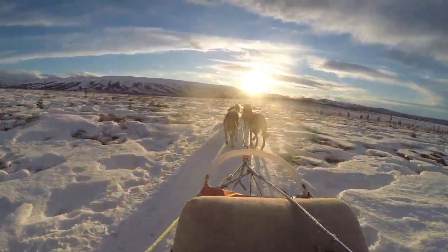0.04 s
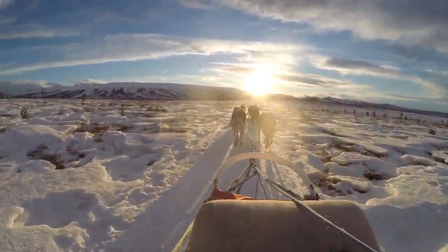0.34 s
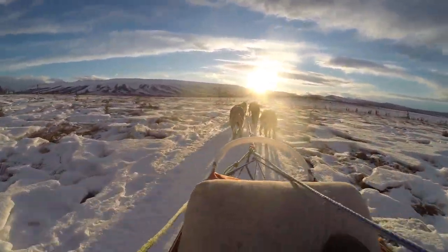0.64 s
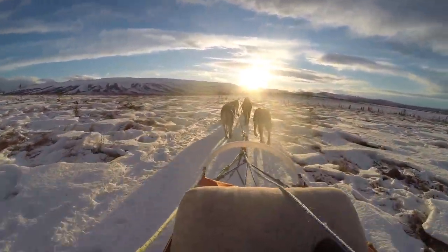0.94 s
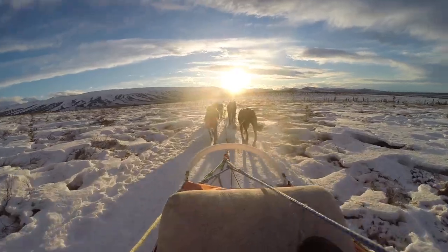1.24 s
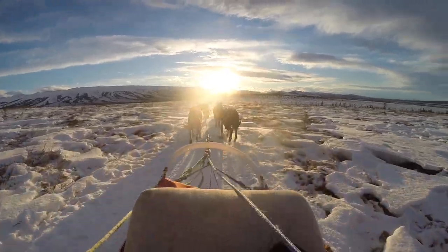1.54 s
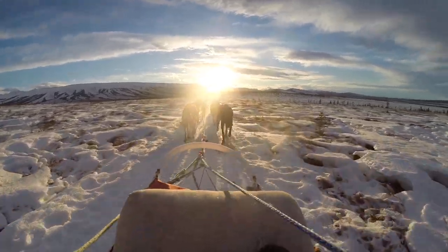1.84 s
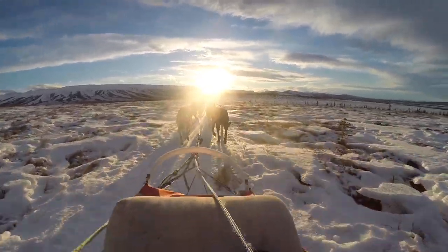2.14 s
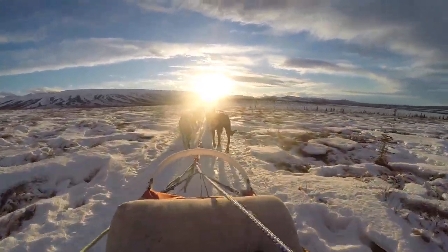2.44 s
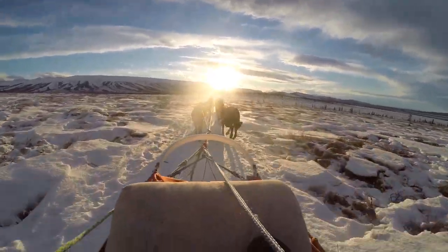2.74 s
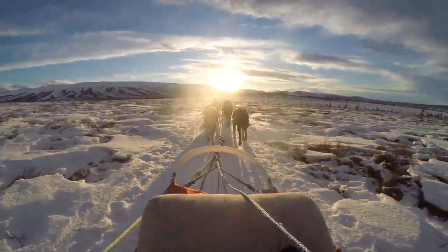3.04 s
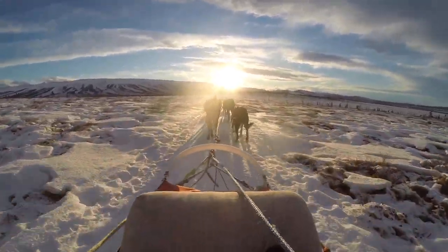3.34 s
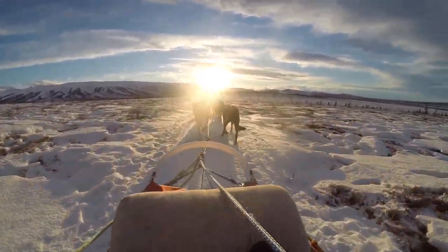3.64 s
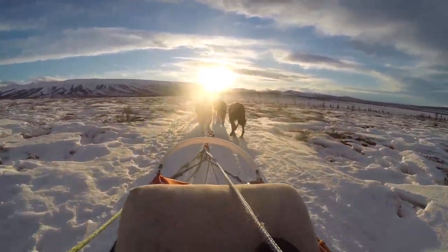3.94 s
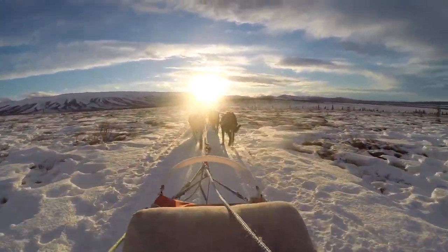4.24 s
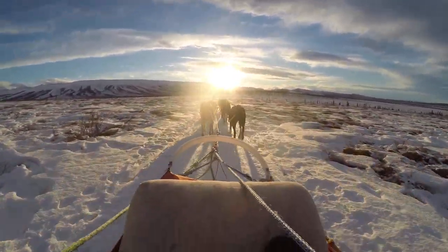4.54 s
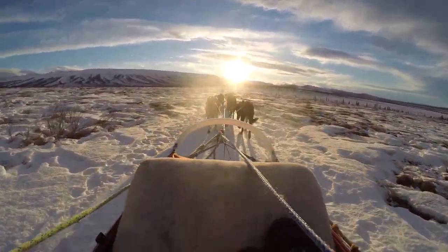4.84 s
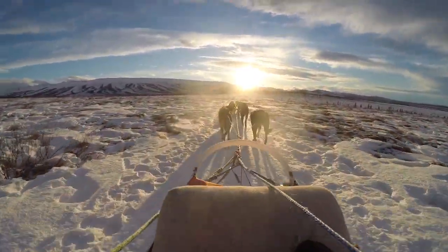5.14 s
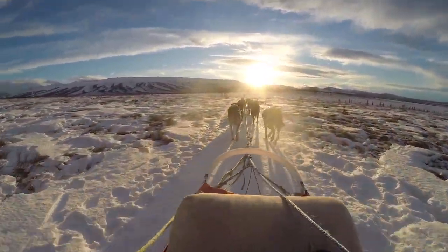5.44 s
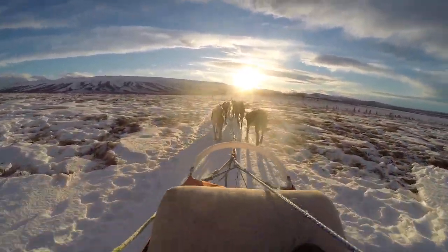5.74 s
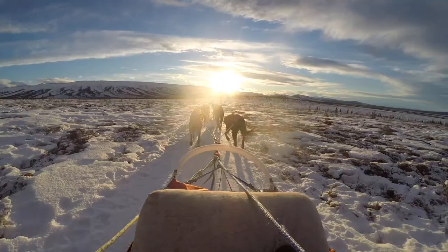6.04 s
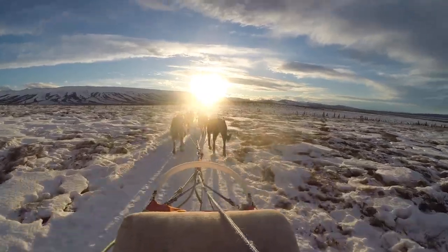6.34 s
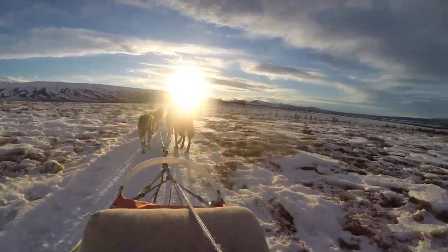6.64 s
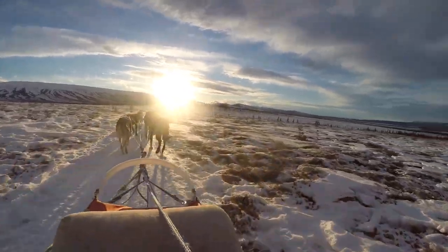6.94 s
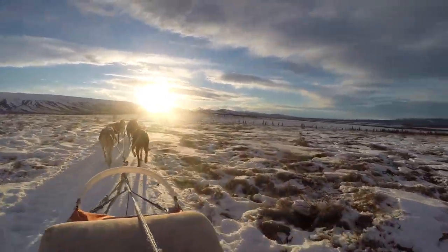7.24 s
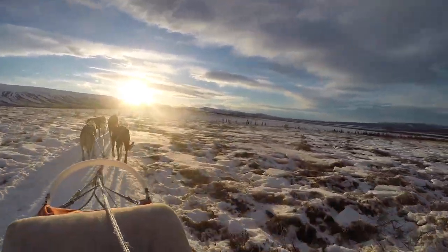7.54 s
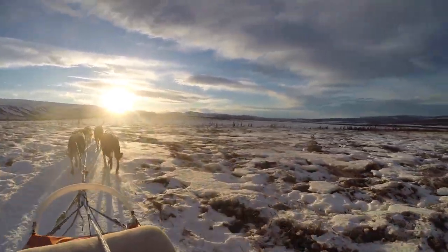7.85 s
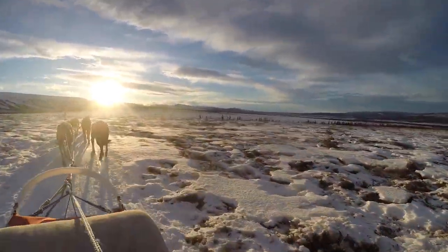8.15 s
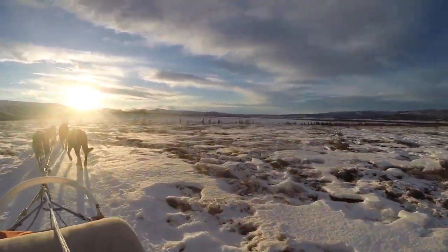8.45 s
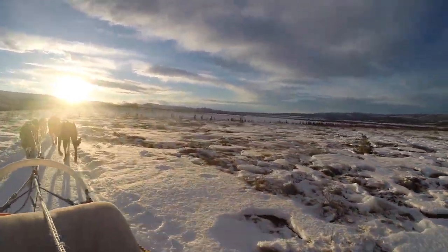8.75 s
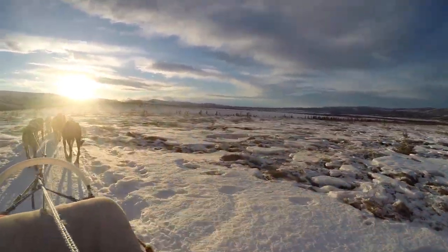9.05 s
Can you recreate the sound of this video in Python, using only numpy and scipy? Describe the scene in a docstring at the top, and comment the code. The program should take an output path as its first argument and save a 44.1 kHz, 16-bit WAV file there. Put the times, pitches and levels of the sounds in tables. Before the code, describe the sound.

A dog sled glides over crusty snow, its runners making a close, grainy rush that swells and eases. Wind buffets the microphone on the sled, and the frame shudders with low, soft jolts. About halfway through, a few ice crumbs tick sharply against the microphone. Near the end the open trail turns rough, and a quick run of hollow knocks and clacks shakes the sled.

```python
"""Riding a dog sled over snow

One microphone, in a camera on the sled, close to the runners: snow grains break under them in a rush
and hiss, and fine powder sizzles. Wind buffets the microphone; ruts and drifts shake the frame.
Bumps knock it, most of all on the rough ground at the end, and ice crumbs tick on the housing."""
import sys
import numpy as np
from scipy import signal
from scipy.fft import rfft, irfft, next_fast_len
from scipy.io import wavfile
from scipy.ndimage import uniform_filter1d

SR = 44100
rng = np.random.default_rng(int(sys.argv[2]) if len(sys.argv) > 2 else 0)


def generate_wav(sig):
    """Save sig (samples, or channels by samples) to the path in sys.argv[1] as 16-bit PCM at SR."""
    pcm = np.round(np.clip(np.atleast_2d(sig).T, -1, 1) * 32767).astype(np.int16)
    wavfile.write(sys.argv[1], SR, pcm)


N = 400869
T = np.arange(N) / SR

# friction of the runners on the snow (time [s], level [dB])
FRICTION = [(0.0, -54), (0.29, -44.5), (0.76, -50), (0.83, -46), (2.24, -46), (2.35, -55), (2.74, -53),
            (3.28, -41.5), (3.94, -47.5), (4.13, -40.5), (4.59, -47.5), (4.92, -40), (5.28, -41),
            (5.42, -47.5), (5.57, -39), (6.26, -47.5), (6.36, -41.5), (6.78, -47), (7.38, -46.5),
            (7.44, -41), (8.29, -51), (8.71, -53.5), (9.09, -45.5)]
# crisp patches where the runners dig in (time [s], length [s], rise in friction [dB])
CRISP_PATCHES = [(0.024, 0.26, 13.5), (1.065, .07, 4.5), (1.487, 0.088, 1.5), (1.936, 0.078, 4),
                 (2.03, 0.091, 4), (2.192, 0.092, 4), (2.49, 0.17, 7.5), (2.995, 0.11, 4),
                 (3.296, 0.09, 1.5), (4.212, .11, 3), (4.523, 0.094, 5.5), (5.887, 0.1, 4),
                 (7.58, 0.074, 2.5), (7.747, .08, 2), (8.128, 0.13, 5.5), (8.78, 0.1, 9.5)]
# crests where the sled goes light (time [s], length [s], change in friction [dB])
CRESTS = [(0.581, .07, -7), (1.395, 0.18, -3.5), (1.643, 0.051, -9.5), (1.828, 0.23, -6.5),
          (2.097, 0.066, -2), (2.27, 0.067, 1), (2.753, 0.075, -11), (4.585, 0.031, -5), (4.797, 0.042, -4),
          (5.007, 0.069, -5.2), (7.31, 0.059, -9), (7.819, 0.069, -4), (8.01, 0.14, -7)]
# lumps of crust that break (time [s], rise in friction [dB])
CRUST_LUMPS = [(1.785, 6.5), (2.156, 6.5), (4.808, 9.5), (4.866, 1), (5.868, 3)]
# broad spectrum of the runners (frequency [Hz], relative level [dB])
SNOW_SPECTRUM = [(100, -4.5), (250, 6), (450, -3), (800, -2), (1100, -1.5), (1600, 0), (2000, -2.5),
                 (2700, -3.5), (3200, -11.5), (5150, -16.5), (5700, -22), (8400, -28), (9600, -37),
                 (15000, -47.5)]
# air resonances of the housing around the microphone (frequency [Hz], width [Hz], gain [dB])
HOUSING_RESONANCES = [(634, 80, 5), (1314, 248, 9.5), (2387, 250, 5), (3815, 580, 6.5), (4840, 880, 8.5),
                      (6880, 350, 6), (6970, 260, -2), (11450, 1000, 3), (12200, 500, 3.5)]
# sizzle of powder thrown up by the runners (time [s], level [dB])
POWDER_SPRAY = [(0.0, -75), (2.88, -74.5), (3.29, -74), (3.8, -75), (4.1, -72), (4.73, -78), (4.96, -76),
                (5.39, -74), (5.74, -74), (6.0, -72), (7.34, -74), (7.57, -66.5), (8.43, -74),
                (9.09, -69.5)]
# roughness of the ride (time [s], wind level [dB], shudder level [dB])
RIDE_LEVELS = [(0.0, -35.5, -40), (0.3, -33, -49), (0.88, -38, -43), (2.33, -33, -47), (2.66, -39, -50),
               (3.39, -34, -45), (3.87, -39.5, -47), (4.2, -30, -41.5), (4.73, -38.5, -45),
               (5.06, -29.5, -43), (5.95, -33.5, -41.5), (6.61, -35, -41.5), (8.18, -29.5, -42),
               (9.09, -29.5, -47)]
# wind on the microphone (frequency [Hz], relative level [dB])
WIND_SPECTRUM = [(8, -16), (20, 0.5), (35, -1), (55, -2), (78, -1.5), (105, -7.5), (130, -14), (200, -26),
                 (400, -52), (4000, -130)]
# shudder of the frame (frequency [Hz], relative level [dB])
SHUDDER_SPECTRUM = [(60, -9.5), (120, 5), (170, 0.5), (240, -6.5), (310, -10.5), (420, -16.5), (640, -18),
                    (900, -30), (6000, -110)]
# bumps on the frame (time [s], weight [dB], sharpness of contact [dB], rebound gap [s])
BUMPS = [(0.013, -26.5, -43.5, 0.0024), (0.643, -26.5, -33, 0.0025), (0.701, -31, -48, 0.018),
         (1.359, -28, -55, 0.0012), (6.851, -26.5, -32.5, 0.0028), (7.494, -25, -35, 0.0011),
         (7.572, -24, -33, 0.021), (7.7562, -26, -28.5, 0.00053), (7.8355, -25.5, -32.5, 0.00071),
         (8.125, -26, -49, 0.004), (8.1609, -22.5, -30, .0215), (8.236, -26, -31.5, 0.0015),
         (8.27, -28, -53, 0.0049), (8.341, -23.5, -28, 0.019), (8.413, -27.5, -34, 0.00024),
         (8.4968, -23.5, -26, 0.00085), (8.547, -28, -33, 0), (8.638, -27, -32, 0.026), (8.81, -30, -27, 0),
         (8.8586, -23.5, -27.5, 0.00064), (8.879, -30, -40, 0.0038), (8.904, -25.5, -34.5, 0),
         (8.9335, -21, -27.5, 0)]
# frame modes rung by the weight of a blow (frequency [Hz], level [dB], t60 [s])
THUD_MODES = [(73.5, 12, 0.1), (189.6, 7, 0.038), (241, -1, 0.042), (288, -5, 0.055), (646, -16.5, 0.063),
              (686, -10.5, 0.045)]
# frame modes rung by the hard contact (frequency [Hz], level [dB], t60 [s])
CLACK_MODES = [(996, -5, 0.017), (1260, -1.3, 0.016), (1486, 5, 0.013), (2097, -5, 0.02),
               (2414, -5.5, 0.016), (4160, -8, 0.002), (4600, -11, 0.0048)]
# soft heaves over drifts (time [s], level [dB])
DRIFTS = [(2.318, -24), (2.498, -13.5), (3.482, -21), (4.536, -18), (5.168, -22), (5.884, -16),
          (6.863, -25), (7.231, -18.5), (8.661, -17.5)]
# ice crumbs striking the housing (time [s], level [dB], fragment level [dB])
ICE_CRUMBS = [(1.0038, -43, -67), (1.6624, -36, -55), (2.196, -39, -60), (2.4246, -40, -58),
              (2.4768, -43, -63), (2.773, -41, -60), (2.793, -36.5, -52), (2.83, -37, -59),
              (2.845, -40, -60), (4.7559, -28.5, -48), (4.767, -35, -42), (4.981, -18.5, -52),
              (5.0157, -31.5, -46), (5.885, -29.5, -42), (8.6774, -44, -64)]
# modes of the housing's shell (frequency [Hz], level [dB], t60 [s])
SHELL_MODES = [(4600, -12, 0.0042), (4940, 3, 0.006), (6960, -5.5, 0.005), (7950, -1.5, 0.0026),
               (11120, -8, 0.0041), (12500, -15, 0.0037), (14100, -15, .002)]

# a blow runs along the frame and back: the time it takes and the share that returns
RETURN_S, RETURN_SHARE = 0.00312, 0.54


def runners(rush_db=0.58, hiss_db=-13.0, grains_per_s=2500, shatter_db=-46.5, skim_db=-53.5):
    """Countless snow grains break under the runners, close by; hard pressure brightens the hiss."""
    friction_db = curves(FRICTION)[0] + terrain() + 0.48 * wander(7)
    bite_db = 0.67 * np.maximum(friction_db - shatter_db, 0)  # shattering crust: extra hiss
    bite_db += 0.3 * np.maximum(skim_db - friction_db, 0)  # skimming: the hiss outlasts the rush
    sizes = amp(3 * np.minimum(rng.exponential(1, N), 4)) * rng.choice([-1, 1], N)
    grains = unit(sizes * (rng.random(N) < grains_per_s / SR))
    snow = colour(rng.standard_normal(N) + 0.47 * grains, snow_colour)
    lows = colour(snow, lambda hz: rolloff_db(hz / 3000))
    hiss = (snow - lows) / band_rms(snow, 3300, 5500)
    rush = lows / band_rms(snow, 1000, 3000)
    load = amp(friction_db + crust() + wander(25))  # the runners catch and slip on uneven crust
    return load * (rush * amp(rush_db) + hiss * amp(hiss_db + bite_db + 1.5 * wander(38)))


def terrain():
    """Change of friction in dB: it swells smoothly on crisp patches and eases over crests."""
    change_db = np.zeros(N)
    for s, length, db in CRISP_PATCHES + CRESTS:
        near = abs(T - s) < length / 2
        change_db[near] += db * np.cos(np.pi * (T[near] - s) / length) ** 2
    return change_db


def crust(fade_s=0.02):
    """Extra friction in dB: it leaps as a lump breaks and quickly dies away."""
    rise_db = np.zeros(N)
    for s, db in CRUST_LUMPS:
        add(rise_db, s, db * np.exp(-T[:SR // 5] / fade_s))
    return uniform_filter1d(rise_db, size=60)


def snow_colour(hz):
    """The spectrum of the snow in dB, as it reaches the microphone through the housing."""
    resonances = sum(db / (1 + (2 * (hz - f) / width) ** 2) for f, width, db in HOUSING_RESONANCES)
    return spectrum_db(SNOW_SPECTRUM, hz) + resonances


def rumble(wind_db=3.0, shudder_db=-1.0, gust_db=2.03, jolt_db=3.5):
    """Wind buffets the microphone; the frame shudders over ruts, more where the runners dig in."""
    buffet_db, shake_db = curves(RIDE_LEVELS)
    wind = unit(colour(rng.standard_normal(N), lambda hz: spectrum_db(WIND_SPECTRUM, hz)))
    frame = unit(colour(rng.standard_normal(N), lambda hz: spectrum_db(SHUDDER_SPECTRUM, hz)))
    wind *= amp(wind_db + buffet_db + gust_db * wander(8))
    frame *= amp(shudder_db + shake_db + 0.43 * terrain() + jolt_db * wander(11.7))
    return wind + frame


def ruts(gain_db=8, per_s=18, rock_hz=92, t60=0.07):
    """Small ruts come at random, and each gives the loaded sled a soft, low jolt."""
    t = T[:SR // 5]
    sizes = amp(2 * np.minimum(rng.exponential(1, N), 2)) * (rng.random(N) < per_s / SR)
    jolt = amp(-60 * t / t60) * np.sin(2 * np.pi * rock_hz * t) * (1 - np.exp(-t * rock_hz))
    jolts = signal.oaconvolve(sizes, jolt / abs(jolt).max())[:N]
    return amp(gain_db + curves(RIDE_LEVELS)[1]) * jolts


def bumps(lag_s=0.0011):
    """A hard bump clacks, then its weight rocks the frame; the returning wave makes the thud hollow."""
    clacks, thuds = np.zeros(N), np.zeros(N)
    for s, weight_db, sharp_db in landings():
        add(clacks, s, amp(sharp_db) * ring(CLACK_MODES, spread=0.05, rise_s=0.0003))
        thud = amp(weight_db) * ring(THUD_MODES, spread=0.025, rise_s=0.002)
        add(thuds, s + lag_s, thud)
        add(thuds, s + lag_s + RETURN_S, RETURN_SHARE * thud)
    # the brief contact carries no bass, and the microphone passes no slow push
    return high_pass(clacks, hz=900, order=6) + high_pass(thuds, hz=32, order=2)


def landings(weight_loss_db=4, sharp_loss_db=3.5):
    """The sled lands three times, ever softer, if its rebound gap exceeds RETURN_S; otherwise once."""
    for s, weight_db, sharp_db, gap_s in BUMPS:
        for k in range(3 if gap_s > RETURN_S else 1):
            yield s + k * gap_s, weight_db - k * weight_loss_db, sharp_db - k * sharp_loss_db


def heaves(sway_hz=68, swell_s=0.015):
    """A soft drift rocks the frame for a few cycles without any clack."""
    out, t = np.zeros(N), np.arange(-SR // 10, SR // 10) / SR
    sway = -np.exp(-(t / swell_s) ** 2) * np.cos(2 * np.pi * sway_hz * t)
    for s, db in DRIFTS:
        add(out, s + t[0], amp(db) * sway)
    return out


def crumbs(scatter_s=0.017, large_db=-24):
    """Ice ticks on the shell, right at the microphone, and splinters; smaller bits sound brighter."""
    ticks = np.zeros(N)
    pivot_hz = SHELL_MODES[3][0]
    for s, crumb_db, fragment_db in ICE_CRUMBS:
        fragments = [(delay, fragment_db) for delay in rng.exponential(scatter_s, 4)]
        for delay, hit_db in [(0.00079, crumb_db)] + fragments:
            db_per_octave = 0.46 * (large_db - hit_db)
            modes = [(hz, db + db_per_octave * np.log2(hz / pivot_hz), t60)
                     for hz, db, t60 in SHELL_MODES]
            add(ticks, s + delay, amp(hit_db) * ring(modes, spread=0.04, rise_s=0.00005))
    # the stiff shell passes almost nothing below its first mode
    return high_pass(ticks, hz=4300, order=8)


def powder(gain_db=2, lowest_hz=6500, flutter_db=3.0):
    """Fine dry snow sprays off the runners with a faint sizzle."""
    spray = colour(rng.standard_normal(N), lambda hz: snow_colour(hz) + rolloff_db(lowest_hz / (hz + 1)))
    return amp(gain_db + curves(POWDER_SPRAY)[0] + flutter_db * wander(17)) * unit(spray)


def electronics(whine_hz=14160, whine_db=-84, pulse_hz=30, waver_hz=70, hiss_db=-79):
    """The noise floor: the camera's own very faint hiss and pulsing whine."""
    turns = np.cumsum(whine_hz + waver_hz * wander(150)) / SR
    pulse = 1 + 0.7 * np.sin(2 * np.pi * pulse_hz * T)
    whine = unit(np.sin(2 * np.pi * turns) * pulse)
    return amp(whine_db) * whine + amp(hiss_db) * rng.standard_normal(N)


def ring(modes, spread, rise_s):
    """One blow on damped modes; each blow lands elsewhere, so pitch and strength vary a little."""
    t = T[:SR // 6]
    chance = rng.uniform(-1, 1, (len(modes), 2))
    tones = [amp(db + 2 * strength - 60 * t / t60) * np.sin(2 * np.pi * hz * (1 + spread * detune) * t)
             for (hz, db, t60), (detune, strength) in zip(modes, chance)]
    return sum(tones) * (1 - np.exp(-t / rise_s))


def amp(db):
    """Decibels to gain."""
    return 10 ** (np.asarray(db) / 20)


def unit(x):
    """Scales to an rms of 1."""
    return x / np.sqrt(np.mean(x ** 2) + 1e-20)


def spectrum_db(points, hz):
    """A spectrum in dB, joined by straight lines over log frequency."""
    f, db = np.transpose(points)
    return np.interp(np.log(hz + 1), np.log(f + 1), db)


def curves(rows):
    """Every level column of a timed table, sample by sample."""
    s, *columns = np.transpose(rows)
    return [np.interp(T, s, column) for column in columns]


def colour(x, db_at):
    """Filters x by a gain in dB given as a function of frequency."""
    size = next_fast_len(N + 4096)
    gain = amp(db_at(np.fft.rfftfreq(size, 1 / SR)))
    return irfft(rfft(x, size) * gain, size)[:N]


def rolloff_db(ratio):
    """A filter slope that falls 48 dB an octave once the frequency ratio passes 1."""
    return -20 * np.log10(1 + ratio ** 8)


def high_pass(x, hz, order):
    """Takes away what lies below hz."""
    return signal.sosfilt(signal.butter(order, hz, "high", fs=SR, output="sos"), x)


def band_rms(x, low_hz, high_hz):
    """The rms of x between two frequencies."""
    size = next_fast_len(N)
    hz = np.fft.rfftfreq(size, 1 / SR)
    band = rfft(x, size)[(hz > low_hz) & (hz < high_hz)]
    return np.sqrt(2 * np.sum(abs(band) ** 2) / (N * size))


def wander(rate_hz):
    """Smooth random motion of rms 1, at up to the given rate."""
    return unit(signal.sosfilt(signal.butter(4, rate_hz, fs=SR, output="sos"), rng.standard_normal(N)))


def add(mix, s, sound):
    """Mixes a sound in at time s."""
    part = mix[max(round(s * SR), 0):][:len(sound)]
    part += sound[:len(part)]


def scene():
    """The trail in mono, from the microphone on the sled."""
    return (runners() + powder() + rumble() + ruts() + bumps() + heaves() + crumbs() + electronics())[None]


def record(dry):
    """The camera cuts the treble above 15.6 kHz."""
    low_pass = signal.firwin(255, 15600, window=("kaiser", 9), fs=SR)
    return signal.oaconvolve(dry, low_pass[None], "same")


dry = scene()
out = record(dry)
generate_wav(out)
```